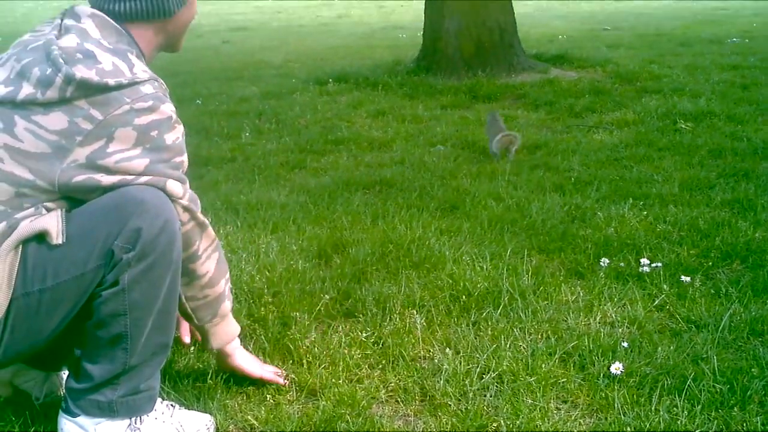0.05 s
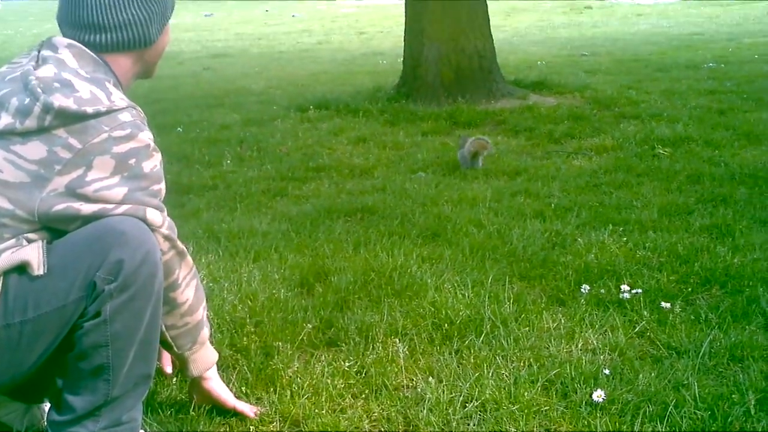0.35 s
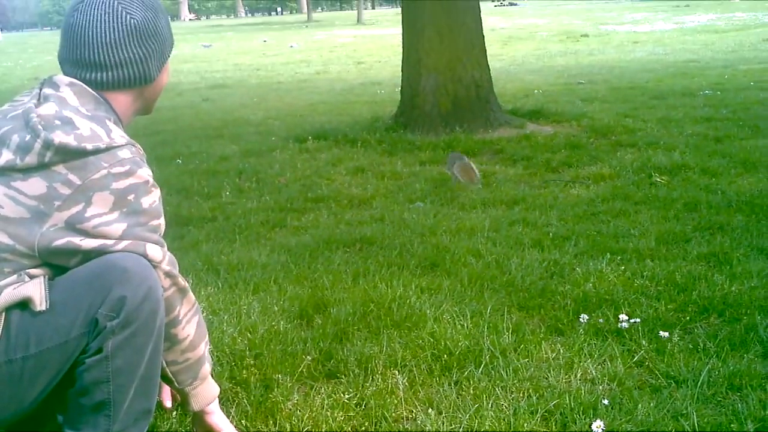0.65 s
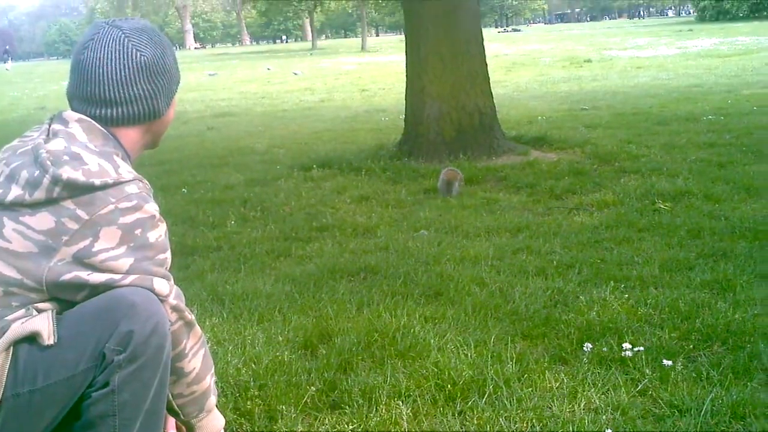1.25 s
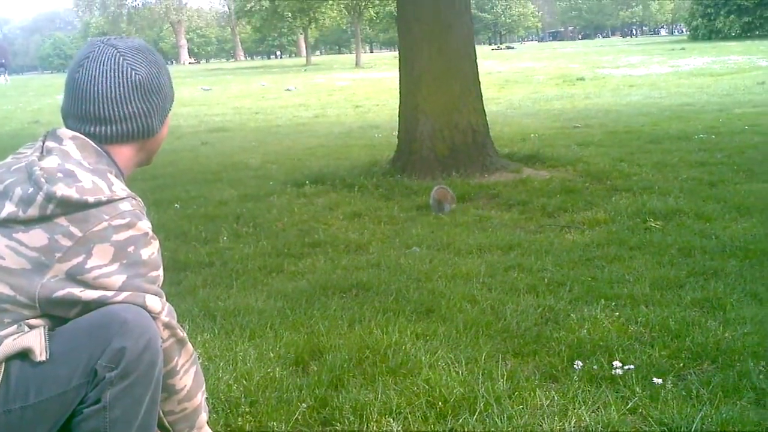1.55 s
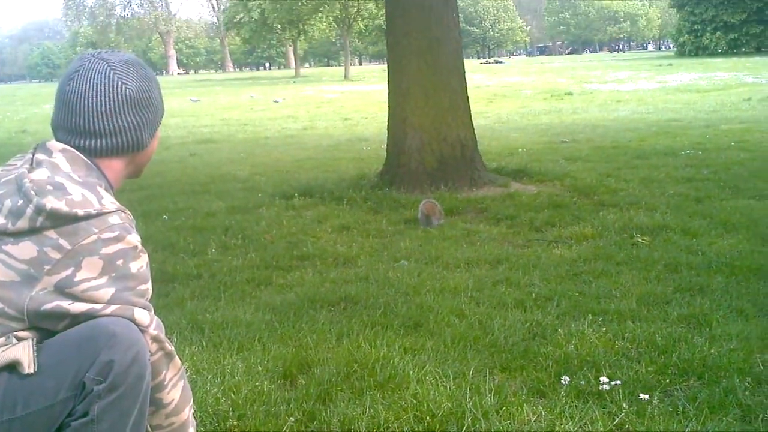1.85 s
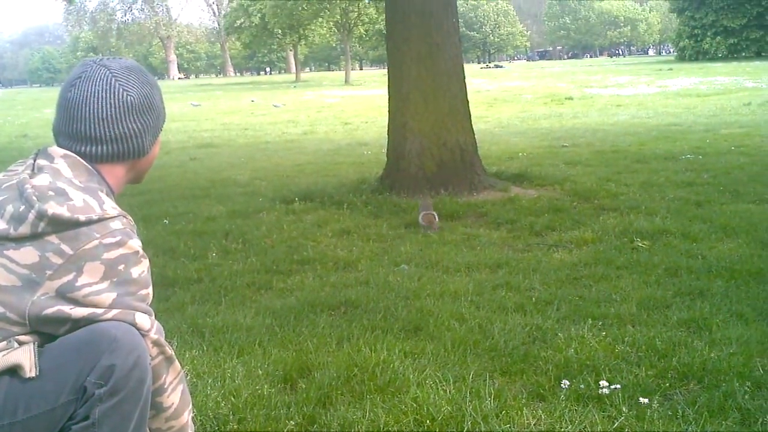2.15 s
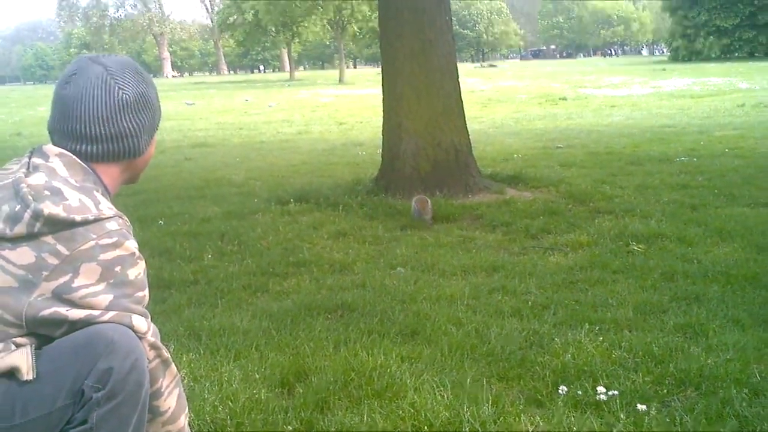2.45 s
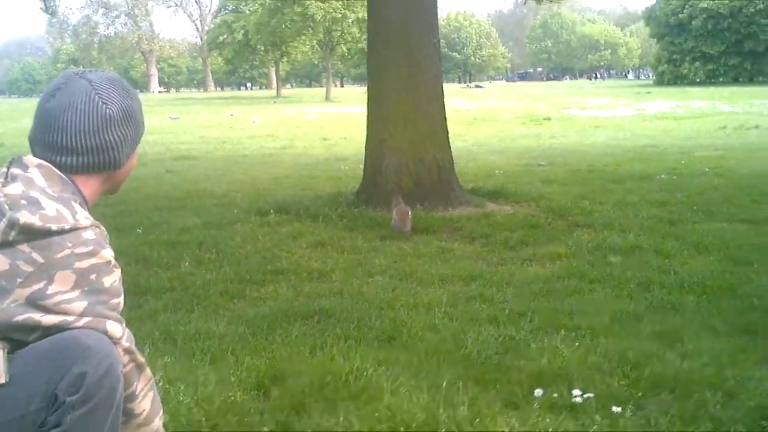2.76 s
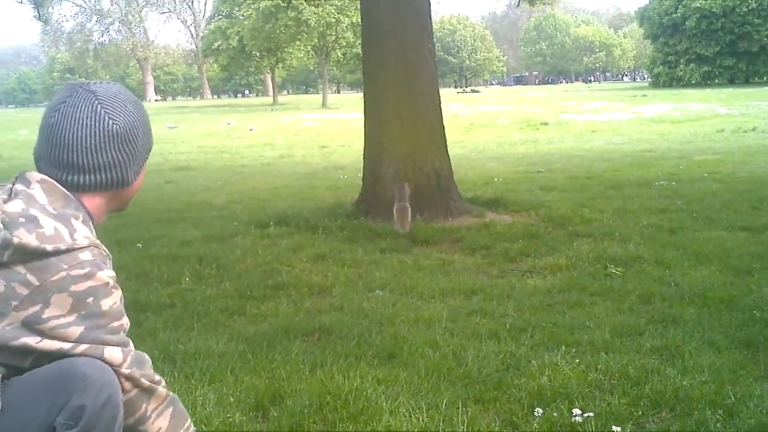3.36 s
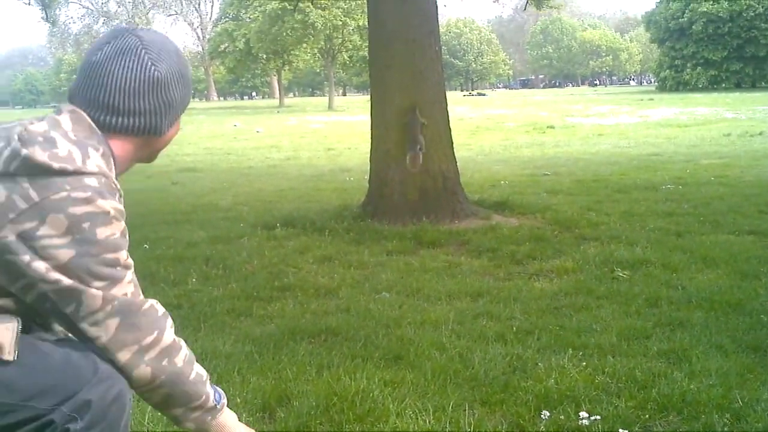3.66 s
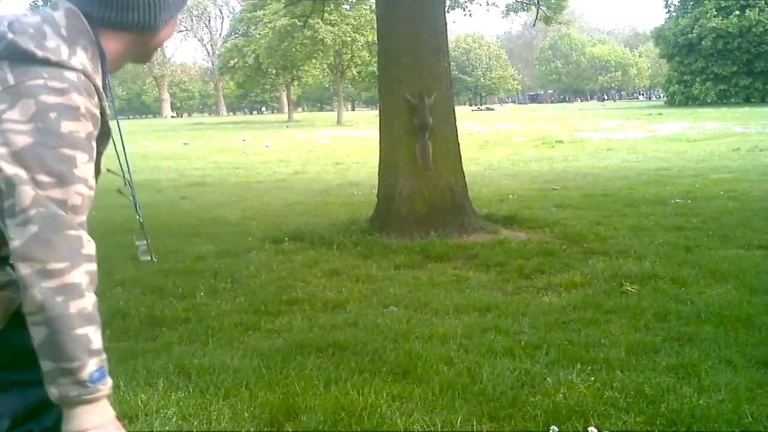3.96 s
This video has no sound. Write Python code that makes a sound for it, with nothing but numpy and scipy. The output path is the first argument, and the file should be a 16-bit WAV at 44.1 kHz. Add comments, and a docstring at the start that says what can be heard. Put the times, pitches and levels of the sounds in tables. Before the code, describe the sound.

Low outdoor park ambience, broken by a brief fabric rustle and sharp handling clicks.

```python
"""A quiet park, heard from a hand-held camera with two closely spaced microphones.
Far off, traffic swells, engines drone and a faint bird whistles; the air rumbles softly now and then.
Close by, clothing slides and snaps; then fingers shift on the camera, which clicks, knocks once and
rumbles. Each channel is one microphone minus the delayed other, so a touch on one sounds very wide."""
import sys
import numpy as np
from scipy import signal
from scipy.fft import rfft, irfft
from scipy.io import wavfile
from scipy.ndimage import uniform_filter1d

SR = 44100
rng = np.random.default_rng(int(sys.argv[2]) if len(sys.argv) > 2 else 0)


def generate_wav(signal):
    """Clip the signal to [-1, 1] and save it as 16-bit WAV at the path in sys.argv[1]."""
    frames = np.transpose(np.atleast_2d(signal))
    scaled = np.clip(frames, -1, 1) * 32767
    pcm = np.round(scaled).astype(np.int16)
    wavfile.write(sys.argv[1], SR, pcm)


N = 176400
TIME = np.arange(N) / SR


def amp(db):
    """Decibels to gain."""
    return 10 ** (np.asarray(db) / 20)


def unit(x):
    """Scales to rms 1."""
    return x / np.sqrt(np.mean(x ** 2) + 1e-20)


def level_at(colour, hz):
    """Level in dB of a spectrum, interpolated on a log-frequency axis."""
    f, db = np.transpose(colour)
    return np.interp(np.log(hz + 1), np.log(f), db)


def tilted(colour, tilt_db):
    """Brightens or dulls a spectrum above 2400 Hz, in dB per octave."""
    return [(hz, db + tilt_db * np.log2(max(hz / 2400, 1))) for hz, db in colour]


def add(mix, start, sound):
    """Adds a two-microphone sound at a start time in seconds."""
    part = mix[:, round(start * SR):][:, :sound.shape[1]]
    part += sound[:, :part.shape[1]]


def noise(gain):
    """Noise of rms 1 whose spectrum follows gain(hz)."""
    spectrum = rfft(rng.standard_normal(N)) * gain(np.fft.rfftfreq(N, 1 / SR))
    return unit(irfft(spectrum, N))


def band(centre_hz, half_width_hz):
    """A bell-shaped band of noise, rms 1."""
    return noise(lambda hz: np.exp(-((hz - centre_hz) / half_width_hz) ** 2))


def wander(rate_hz):
    """Slow random motion of rms 1."""
    return band(0, rate_hz)


def tick(colour, rattle_s, rattle_db, size=2048):
    """An impulse and a brief rattle through a causal colour filter; energy 1."""
    hz = np.abs(np.fft.fftfreq(size, 1 / SR))
    log_gain = np.log(amp(level_at(colour, hz)) * (hz + 1) / (hz + 150))
    body = np.fft.ifft(np.exp(np.conj(signal.hilbert(log_gain)))).real  # minimum phase
    push = rng.standard_normal(size) * np.exp(-np.arange(size) / SR / rattle_s)
    push *= amp(rattle_db) / np.linalg.norm(push)
    push[0] += 1
    sound = signal.fftconvolve(push, body)[:size]
    return sound / np.linalg.norm(sound)


def ring(modes, tilt_db, rise_cycles, size=6000):
    """Damped modes of alternating sign; each swells over part of a cycle, so low ones come in later."""
    t = np.arange(size) / SR
    sound = np.zeros(size)
    for k, (hz, db, t60) in enumerate(modes):
        rise = 1 - np.exp(-t * hz / rise_cycles)
        decay = amp(db + tilt_db * np.log2(hz / modes[0][0]) - 60 * t / t60)
        sound += (-1) ** k * rise * decay * np.sin(2 * np.pi * hz * t)
    return sound


# Park air, alike at both microphones and opposite between them (f/Hz, level/dB per Hz)
AIR_SHARED = [(25, -78), (45, -79.5), (80, -76), (120, -66), (180, -74.5), (235, -76), (320, -85.5),
              (380, -86.5), (620, -93.5), (950, -91), (1350, -93.5), (1680, -92.5), (1740, -103),
              (1950, -101.5), (2400, -104.5), (3500, -109), (4900, -115), (7000, -111), (10000, -115.5),
              (15500, -116)]
AIR_OPPOSED = [(25, -100), (45, -104), (80, -100), (115, -85.5), (260, -92), (400, -95), (620, -100),
               (900, -95), (1300, -93.5), (1680, -86), (1770, -100), (2700, -107), (4900, -113),
               (6500, -111), (10000, -116), (15500, -115)]
# Slow swell of the far traffic (t/s, level/dB)
TRAFFIC_SWELL = [(0, -2), (.7, -1.5), (1.4, -0.5), (2.3, -1), (2.8, -0.4), (3.3, 1.5), (3.7, -1.8),
                 (4, -0.6)]


def park_air(patch_db=1.2, top_hz=15800):
    """All around: far traffic swelling in the midrange and a faint hiss, drifting in patches."""
    def layer(colour):
        hz, t, spectra = signal.stft(rng.standard_normal(N), SR, nperseg=2048, noverlap=1536)
        hz = hz[:, None]
        patches = uniform_filter1d(rng.standard_normal(spectra.shape), size=14, axis=0)
        patches = unit(uniform_filter1d(patches, size=9, axis=1))
        swell = np.interp(t, *np.transpose(TRAFFIC_SWELL)) * ((hz > 350) & (hz < 3500))
        spectra *= amp(level_at(colour, hz) + swell + patch_db * patches) * (hz < top_hz)
        return signal.istft(spectra, SR, nperseg=2048, noverlap=1536)[1][:N] * np.sqrt(SR / 2)
    return layer(AIR_SHARED) + np.outer([1, -1], layer(AIR_OPPOSED))


# Drones of far engines (f/Hz, half width/Hz, level/dB)
ENGINE_DRONES = [(151.8, 5, -57.5), (281.2, 4.8, -64.5), (484.2, 7.4, -77.5), (601.6, 7.4, -82.5),
                 (735, 13, -77), (1673, 10, -80.5)]


def engines():
    """Far off: engines hum in narrow bands of noise, alike at both microphones."""
    return sum(amp(db) * band(hz, half_width) for hz, half_width, db in ENGINE_DRONES)


# Brief low swells of the air (peak t/s, half length/s, level/dB)
AIR_GUSTS = [(.165, .055, -46.5), (.55, .035, -54), (2.584, 0.032, -49)]


def gusts():
    """At both microphones: the air swells in a soft, low rumble."""
    level = sum(amp(db) * np.exp(-((TIME - peak) / half) ** 2) for peak, half, db in AIR_GUSTS)
    return level * band(centre_hz=154, half_width_hz=68)


# Notes of the bird (t/s, length/s, first f/Hz, last f/Hz, level/dB)
BIRD_NOTES = [(0.947, 0.16, 2740, 2640, -68), (1.1, .12, 2880, 2950, -75), (1.21, 0.099, 2040, 2000, -70),
              (1.42, 0.15, 2640, 2820, -72), (2.127, .13, 2750, 2680, -72), (2.742, 0.18, 2120, 2060, -67),
              (2.982, .19, 3090, 3055, -74)]


def bird(waver=0.003):
    """Very distant, on the left microphone: soft gliding whistles, almost lost in the air."""
    out = np.zeros((2, N))
    for start, length, first_hz, last_hz, db in BIRD_NOTES:
        progress = np.linspace(0, 1, round(length * SR))
        glide_hz = first_hz + (last_hz - first_hz) * progress
        hz = glide_hz * (1 + waver * wander(40)[:len(progress)])
        whistle = np.sin(np.pi * progress) * np.sin(2 * np.pi * np.cumsum(hz) / SR)
        add(out, start, np.outer([amp(db), 0], whistle))
    return out


# Strokes of sliding cloth (t/s, rise/s, fade/s, level/dB, dullness 0-1)
CLOTH_STROKES = [(2.527, 0.046, 0.021, -43, 0), (2.673, 0.0083, 0.058, -49.5, 0.4),
                 (2.725, 0.018, 0.057, -54, 0.16), (2.865, 0.031, 0.064, -57.5, .1),
                 (2.91, .06, 0.028, -60, 0), (3.15, 0.039, 0.02, -50, 0.9)]
# Bright and dull cloth spectra, blended by dullness (f/Hz, level/dB)
CLOTH_BRIGHT = [(300, -6), (1500, -12), (2500, -10.5), (3500, -10.5), (5000, -13), (6200, -6), (7500, -1),
                (9500, -6.5), (12500, -8.5), (15500, -14)]
CLOTH_DULL = [(2500, -3), (3500, -4), (5000, 1), (6200, 1), (7500, -9), (9500, -10), (12500, -11),
              (15500, -12)]


def cloth_rustle(grain_db=2):
    """Close by, wide across the microphones: fabric slides in grainy strokes that swell and fade."""
    out = np.zeros((2, N))
    for start, rise, fade, db, dull in CLOTH_STROKES:
        def gain(hz):
            return amp((1.5 - dull) * level_at(CLOTH_BRIGHT, hz) + dull * level_at(CLOTH_DULL, hz))
        swell = np.clip((TIME - start) / rise, 0, 1) ** 2
        decay = np.exp(-np.maximum(TIME - start - rise, 0) / fade)
        friction = unit(noise(gain) + np.outer([1, -1], noise(gain))) / np.sqrt(2)
        out += amp(db + grain_db * wander(280)) * swell * decay * friction
    return out


# Small snaps of the cloth (t/s, level/dB, left microphone share 0-1, tilt/dB per octave)
CLOTH_SNAPS = [(2.4257, -38, .7, 0.5), (2.518, -35, 1, 2), (2.548, -32, .8, 0), (2.567, -29, .9, 1),
               (2.569, -7.5, 0.96, 1), (2.5803, -21.5, .8, 2), (2.615, -35, .8, -3), (2.7365, -29, .7, -8),
               (2.7954, -22.5, 1, -1), (2.9108, -27.5, 1, 7), (3.34, -34.5, 0.1, -6), (3.7623, -40, .4, 4)]
# Spectrum of a snap (f/Hz, level/dB)
SNAP_SPECTRUM = [(150, -10), (500, -2), (1200, -22), (2300, -9.5), (3500, -4.5), (4400, -7), (5400, -13),
                 (6500, 1.5), (7800, 5), (9000, -5), (10500, 3), (13000, -6), (15500, -16)]


def cloth_snaps():
    """Close by, mostly on the left microphone: the fabric snaps in tiny, dry ticks."""
    out = np.zeros((2, N))
    for start, db, left, tilt in CLOTH_SNAPS:
        snap = tick(tilted(SNAP_SPECTRUM, tilt), rattle_s=0.0006, rattle_db=-8)
        add(out, start, amp(db) * np.outer([left, 1 - left], snap))
    return out


# Spectrum of the hand rubbing the casing (f/Hz, level/dB)
RUB_SPECTRUM = [(25, -36), (55, -20), (100, 4), (150, 10), (250, -5), (450, -28), (1000, -43), (4000, -68)]


def grip_rub(start_s=3.28, level_db=-51.5, lump_db=3.5):
    """On the camera, at the left microphone: the hand rubs with a steady, lumpy rumble."""
    rumble = noise(lambda hz: amp(level_at(RUB_SPECTRUM, hz)))
    lumps = amp(lump_db * wander(25))
    onset = np.clip((TIME - start_s) / 0.02, 0, 1)
    return np.outer([amp(level_db), 0], unit(rumble * lumps) * onset)


# Soft bumps of the grip (t/s, level/dB, tilt/dB per octave)
GRIP_BUMPS = [(3.268, -41, 4), (3.29, -33, 6.5), (3.389, -29.5, -4), (3.453, -43, 0), (3.516, -38, 1),
              (3.685, -40, 2), (3.795, -36, -8), (3.839, -30.5, 2.5), (3.851, -27, 0.5), (3.901, -39, -7),
              (3.969, -37, -3), (3.988, -34, -3)]
# Casing modes under a soft touch (f/Hz, level/dB, 60 dB decay/s)
SOFT_MODES = [(117, 3.5, 0.057), (210, -2.5, 0.037), (342, -10, 0.018), (500, -25, 0.013)]


def grip_bumps():
    """On the camera, at the left microphone: shifting fingers stir the casing's low modes."""
    out = np.zeros((2, N))
    for start, db, tilt in GRIP_BUMPS:
        add(out, start, np.outer([amp(db), 0], ring(SOFT_MODES, tilt, rise_cycles=0.41)))
    return out


# Sharp clicks (t/s, level/dB, left microphone share 0-1, tilt/dB per octave, rattle level/dB)
CASING_CLICKS = [(3.3883, -0.5, 0, 0, -24), (3.3889, -4.5, 0.05, -1.5, -16), (3.3923, -21, .2, -6, -7),
                 (3.4073, -18.5, 0.1, -11, -5), (3.4192, -15.5, 0.1, -7, 3), (3.4221, -13.5, 0, -6, -6),
                 (3.4257, -22, 0, -10, -3), (3.6548, -24.5, .05, -2.5, -8)]
# Spectrum of a click (f/Hz, level/dB)
CLICK_SPECTRUM = [(150, -22), (500, -12.5), (1000, -8.5), (1600, -12), (2400, -5.5), (3400, -3),
                  (4300, -12), (5400, -5.5), (6600, 6), (7450, 0), (8300, 5), (9500, -1), (10500, -16),
                  (11300, -11), (12800, 0.5), (13900, -11), (15600, -2)]


def casing_clicks():
    """On the camera, mostly at the right microphone: the casing clicks and briefly rattles."""
    out = np.zeros((2, N))
    for start, db, left, tilt, rattle_db in CASING_CLICKS:
        click = tick(tilted(CLICK_SPECTRUM, tilt), rattle_s=0.0023, rattle_db=rattle_db)
        add(out, start, amp(db) * np.outer([left, 1 - left], click))
    return out


# A finger's knock and its bounce (t/s, level/dB, tilt/dB per octave)
FINGER_HITS = [(3.5461, 0.5, 0), (3.5548, -9.5, -1)]
# Casing modes under a knock (f/Hz, level/dB, 60 dB decay/s)
HARD_MODES = [(122, -15.5, 0.037), (222, -4, 0.016), (350, -16.5, .018), (490, -11, 0.018),
              (627, -20, 0.011), (976, -9, 0.011), (1230, -22, .008), (1620, -25, 0.011)]
# Spectrum of the crack on contact (f/Hz, level/dB)
CRACK_SPECTRUM = [(200, -35), (900, 0), (1500, 1), (2300, 2), (3200, -2), (3700, -7), (5000, -6),
                  (7000, -1.5), (9500, -13), (12500, -12), (15500, -22)]


def finger_knock(crack_db=-7):
    """At the left microphone: a finger hits with a crack, rings the casing and bounces."""
    out = np.zeros((2, N))
    for start, db, tilt in FINGER_HITS:
        body = ring(HARD_MODES, tilt, rise_cycles=0.46)
        crack = amp(crack_db + tilt) * tick(CRACK_SPECTRUM, rattle_s=0.001, rattle_db=-5)
        for sound in (body, crack):
            add(out, start, np.outer([amp(db), 0], sound))
    return out


def scene():
    """Park, clothing and hand as they reach the left and right microphones."""
    park = engines() + park_air() + gusts() + bird()
    clothing = cloth_rustle() + cloth_snaps()
    handling = casing_clicks() + finger_knock() + grip_bumps() + grip_rub()
    return park + clothing + handling


def record(dry):
    """In the camera: each channel subtracts the delayed other microphone, then is band-limited."""
    delay_samples, low_cut_hz, top_hz = 15, 57.5, 16300
    other_microphone = np.pad(dry[::-1], ((0, 0), (delay_samples, 0)))[:, :N]
    low_cut = signal.butter(3, low_cut_hz, "highpass", fs=SR, output="sos")
    high_cut = signal.firwin(511, top_hz, window=("kaiser", 9), fs=SR)
    beams = signal.sosfilt(low_cut, dry - other_microphone)
    return signal.oaconvolve(beams, high_cut[None], "same")


dry = scene()
out = record(dry)
generate_wav(out)
```